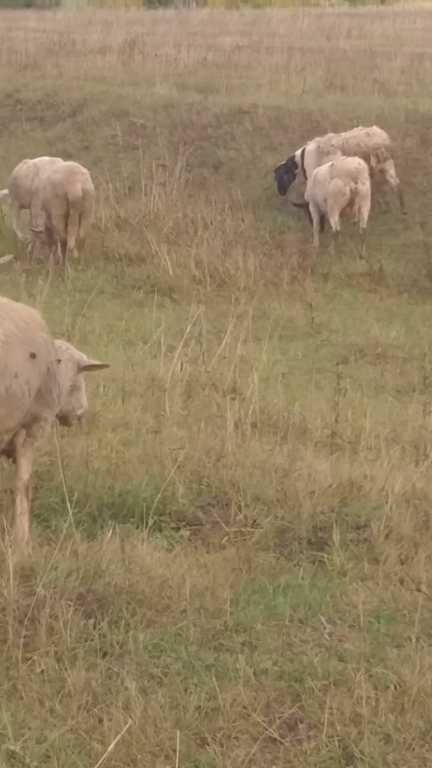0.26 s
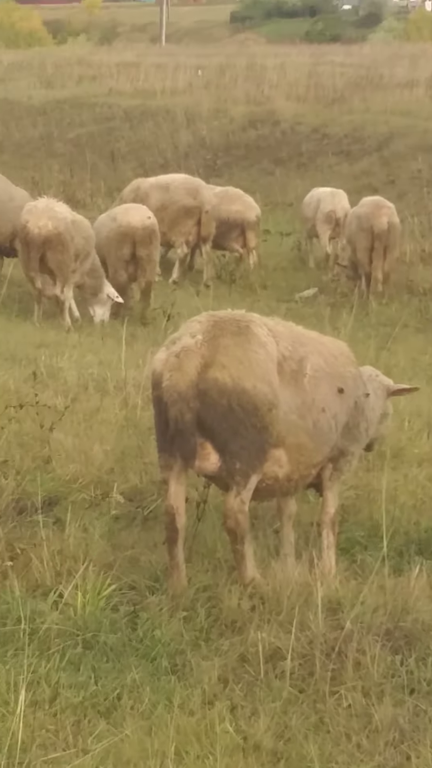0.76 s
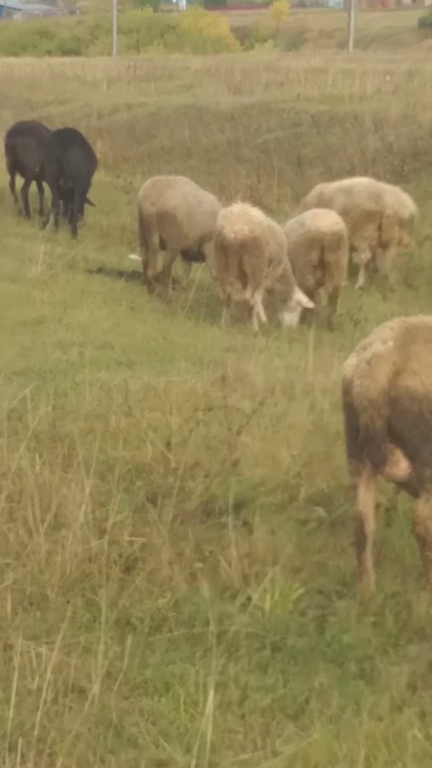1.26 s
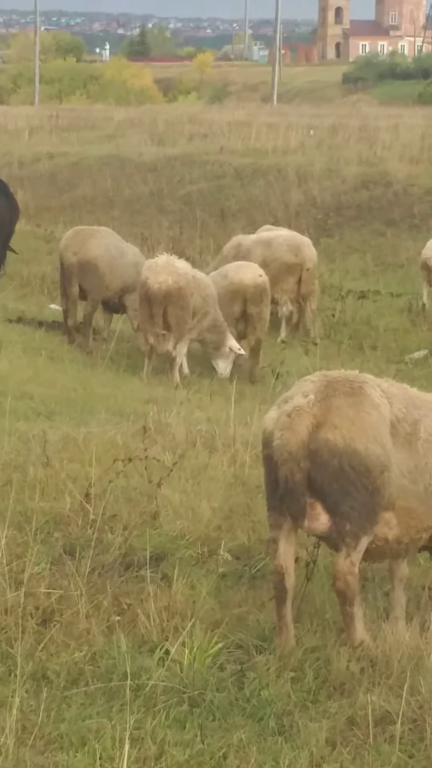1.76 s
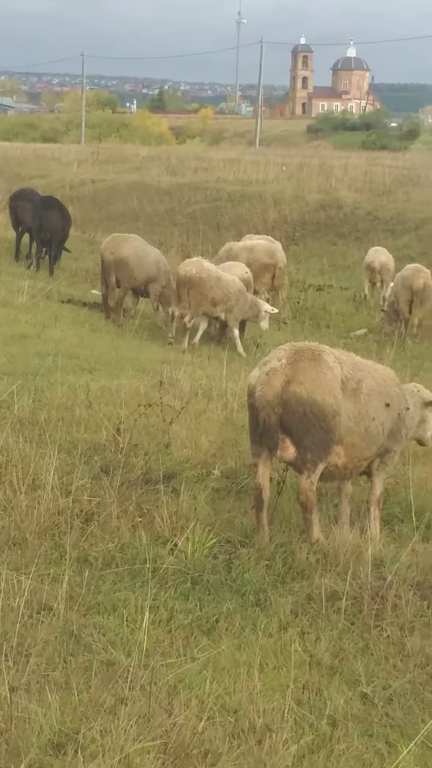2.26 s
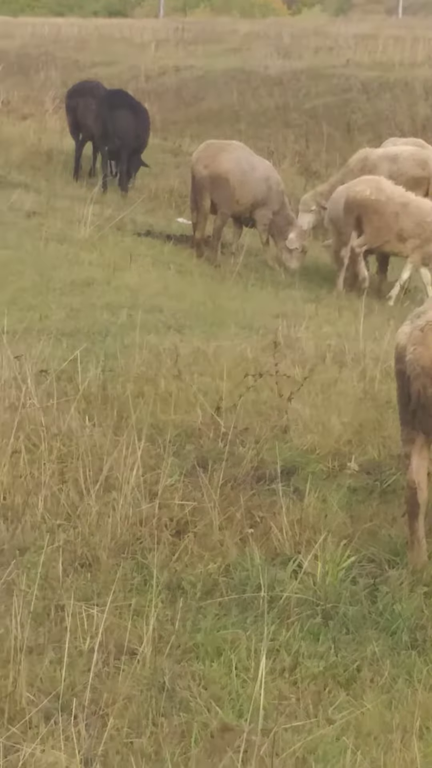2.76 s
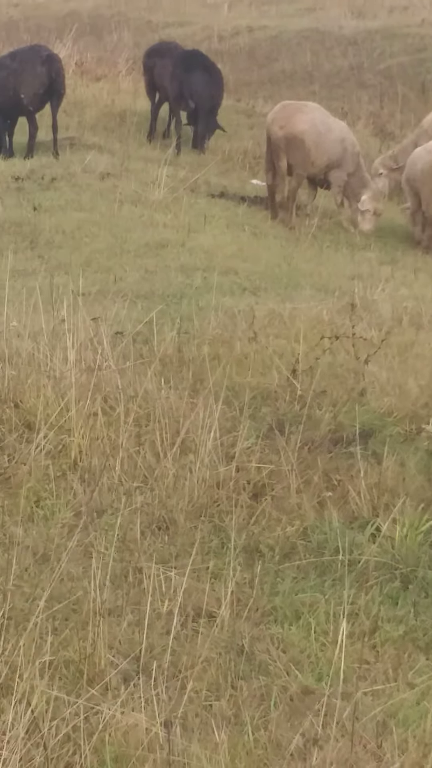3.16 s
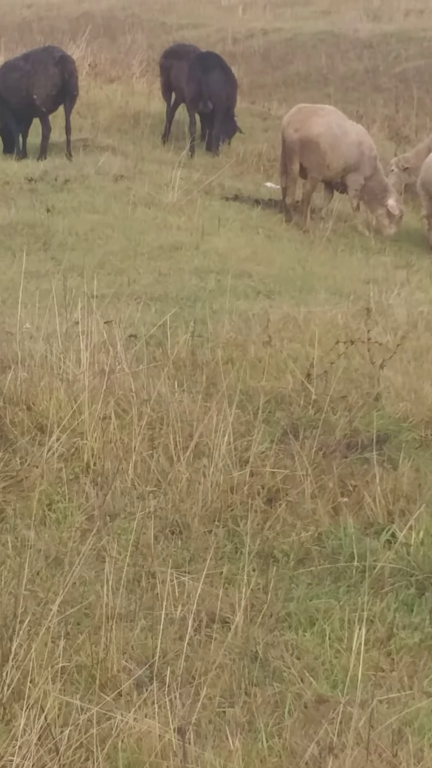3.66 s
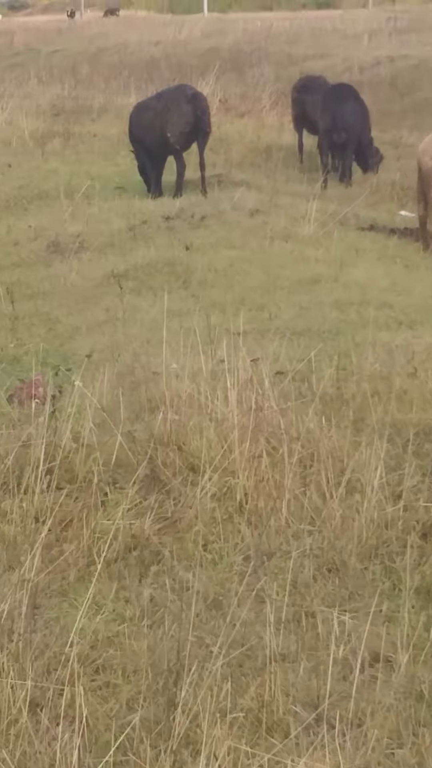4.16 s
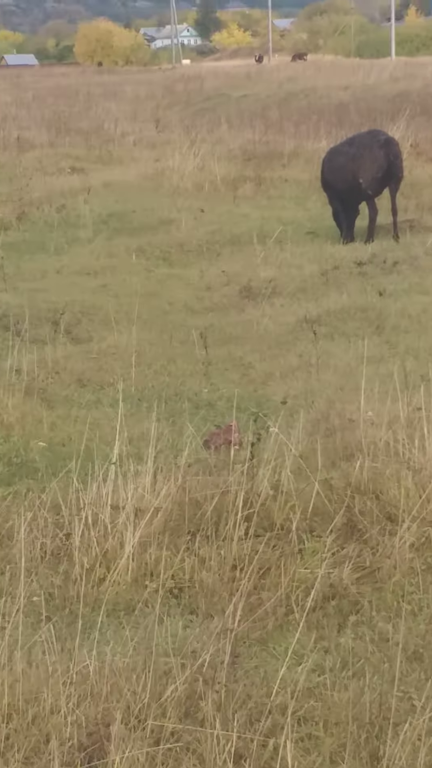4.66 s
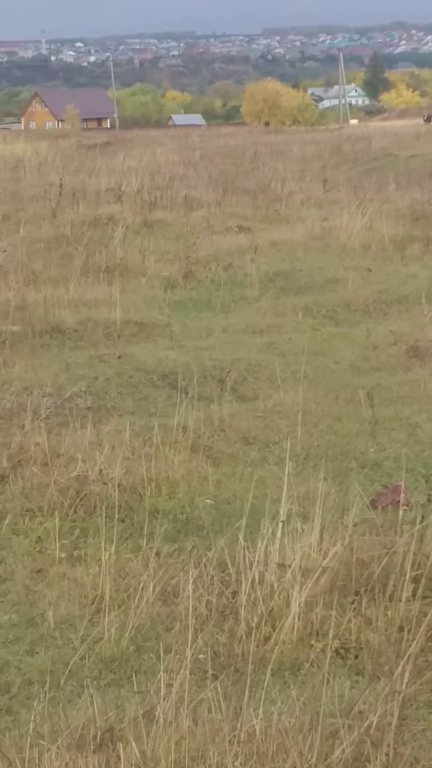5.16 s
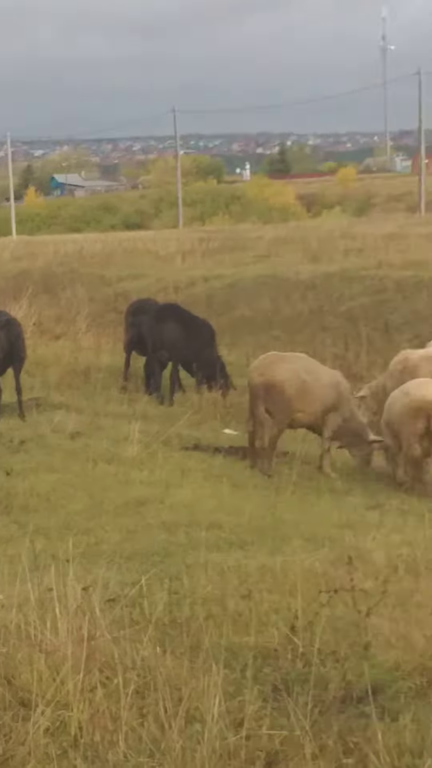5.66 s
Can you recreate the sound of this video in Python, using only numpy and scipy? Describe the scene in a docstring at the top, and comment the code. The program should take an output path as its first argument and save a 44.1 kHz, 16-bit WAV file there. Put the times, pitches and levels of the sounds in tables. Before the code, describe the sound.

Close microphone in dry grass, outdoors without echo. Light woody snaps and gentle brushing come first, then a dense, loud burst of tearing, cracking and rustling between about 1.4 and 2 seconds. It eases into isolated crunches, soft pushes through the grass and a fluctuating low rumble, with a few more snaps near the end. A faint steady air hiss runs throughout.

```python
"""Sheep graze in an open pasture while dry grass is crushed and torn right beside the microphone.
From the start, stalks snap as damped two-mode rings with noise cracks, and noise pushes rustle over a low rumble.
Early on comes one faint gliding sine, a whistle like a far bird; near 1.5 s, dense clicks rip a tuft among the
loudest snaps. Snaps then thin out between crumples, flicks and rasps; even, filtered noise lasts throughout, echo-free."""
import sys
import numpy as np
from scipy import signal
from scipy.io import wavfile
from scipy.ndimage import uniform_filter1d

SR = 44100
rng = np.random.default_rng(int(sys.argv[2]) if len(sys.argv) > 2 else 0)


def store_pcm(level_fs):
    """Save levels as 16-bit WAV."""
    pcm = np.round(np.clip(level_fs, -1, 1) * 32767).astype(np.int16)
    wavfile.write(sys.argv[1], SR, np.atleast_2d(pcm).T)


N = 261072
TIME = np.arange(N) / SR  # s
AGE = np.arange(SR // 16) / SR  # s since a stalk broke
BLOW = np.sqrt(.01 / AGE[-1])  # refers the level of a whole blow to 10 ms

# Breaking stalks; levels over 10 ms: start_s, ring_hz, wood_db, thump_db, crack_db, tick_db
SNAP_EVENTS = [(0.032, 1070, -39, -56, -62, -45.5), (0.0598, 1327, -25, -47, -70, -49),
               (0.129, 1700, -43, -72, -66, -45), (0.1958, 2040, -38.5, -51, -60, -42.5),
               (0.214, 1130, -43, -60, -56, -50), (0.293, 2060, -27.5, -43, -25.5, -47),
               (0.4743, 1660, -49, -37.5, -49, -56), (0.6576, 1170, -30.5, -26.5, -57, -57),
               (0.7248, 1860, -48, -50, -48, -48), (0.966, 1170, -41.5, -42, -59.5, -60.5),
               (1.0515, 1660, -48, -47.5, -78, -55), (1.1549, 1220, -30.5, -34, -42.5, -61),
               (1.2152, 2020, -36.5, -59, -44.5, -53), (1.254, 680, -49, -36, -50.5, -48),
               (1.419, 1330, -35.5, -51, -51.5, -66), (1.4488, 1012, -16.5, -18.5, -28.5, -58),
               (1.5567, 1026, -18.5, -17.5, -37, -23.5), (1.6389, 835, -26.5, -21.5, -26.5, -29.5),
               (1.6692, 1336, -27, -32, -26.5, -39), (1.6819, 740, -15, -17, -34, -28.5),
               (1.7022, 1630, -29, -26, -30.5, -29), (1.767, 2180, -34.5, -27, -30.5, -66),
               (1.9207, 1920, -21.5, -45, -34.5, -59), (1.987, 2090, -32.5, -42, -29, -32),
               (2.157, 790, -38.5, -36, -40.5, -46), (2.45, 1265, -27.5, -26.5, -33.5, -40),
               (2.495, 1430, -41.5, -70, -46, -53.5), (2.6192, 1310, -40.5, -36.5, -45.5, -51),
               (3.0012, 1155, -26.5, -26.5, -39, -40), (3.0915, 990, -38, -32, -39.5, -43),
               (3.333, 1040, -39, -39, -58, -75), (3.5571, 700, -44.5, -42, -41.5, -55),
               (4.1614, 870, -36.5, -35, -54.5, -64), (5.3482, 1180, -27.5, -31, -40.5, -47.5),
               (5.354, 756, -23.5, -59, -76, -80), (5.4424, 1670, -29, -32.5, -45.5, -72),
               (5.7377, 1154, -27.5, -35.5, -37, -54)]
# Small bunches of soft stems that crumple without a crack: start_s, ring_hz, level_db
CRUNCH_EVENTS = [(0.406, 1020, -46), (0.764, 885, -37), (0.811, 1560, -50), (0.871, 1320, -48),
                 (1.776, 594, -32.5), (2.2135, 670, -42), (2.681, 1180, -38), (2.874, 805, -44.5),
                 (3.881, 750, -41), (3.893, 745, -40), (4.148, 550, -35), (4.607, 840, -40),
                 (4.742, 442, -36.5), (5.677, 649, -34.5)]
# Thin dry blades that flick free, with no woody ring: start_s, level_db
FLICK_EVENTS = [(0.11, -46), (0.2871, -41.5), (0.6489, -51), (1.5443, -29.5), (1.549, -35), (1.6028, -33),
                (1.8038, -37.5), (1.8395, -51), (1.895, -43), (1.95, -43.5), (1.9801, -41.5), (2.005, -46),
                (2.131, -49.5), (2.254, -50), (2.5643, -42), (2.6112, -53.5), (2.738, -58.5),
                (4.104, -55.5), (4.237, -61.5), (4.674, -58.5), (4.955, -64), (5.468, -58)]

# Spectra give shape only, since colour() sets the level. All but WOOD_SPECTRUM have the columns
# frequency_hz, density_db (dB per Hz).
# Tug of a breaking stalk on its roots
THUMP_SPECTRUM = [(50, -40), (160, 5), (520, 0.5), (1100, -15.5), (3000, -86.5)]
# Splintering around the stalk's ring: multiple_of_ring_pitch, density_db (dB per Hz)
WOOD_SPECTRUM = [(.3, -20.5), (.9, 5.5), (1.7, 1.5), (2.8, -21), (7, -57.5)]
# Sharp crack of a stalk
CRACK_SPECTRUM = [(1600, -6.5), (3000, 2.5), (4300, -3.5), (5600, -19), (7400, -23.5), (9700, -57)]
# Fine tick of a parting skin
TICK_SPECTRUM = [(2200, 13.5), (4500, 10), (7400, 2.5), (9700, -15), (12500, -4)]
# Crackle of thin blades
CRACKLE_SPECTRUM = [(500, -4.5), (1900, 12), (4400, -1), (7500, -18.5), (9700, -36.5), (13000, -11)]
# Low rumble of movement
RUMBLE_SPECTRUM = [(20, -27), (100, -7), (170, -1.5), (260, -4.5), (420, -16), (900, -27.5), (2500, -85.5)]
# Dull crushing of the sward
CRUSH_SPECTRUM = [(50, -49.5), (200, -16.5), (420, 7.5), (1100, -4), (2000, -13), (2900, -35), (6000, -72)]
# Bright brushing of dry tips
SWISH_SPECTRUM = [(1400, -11), (2200, 1), (4400, -3.5), (5700, -21.5), (7700, -20), (9700, -36.5),
                  (13000, -21)]

# Pushes through the grass: start_s, hold_s, force_db, dryness_db (drive of swish over crushing)
PUSH_EVENTS = [(0.026, 0.22, -53.5, -5.5), (0.313, 0.16, -50, -18), (0.393, 0.16, -57.5, -36),
               (0.62, 0.044, -52, -38), (0.702, 0.3, -56, -14.5), (1.145, 0.023, -45.5, -21),
               (1.257, 0.0074, -42.5, -11), (1.389, 0.22, -37, -12), (1.571, 0.14, -27.5, -11.5),
               (1.725, 0.052, -39, -15), (1.868, 0.16, -34, -13.5), (2.212, 0.063, -37.5, -11),
               (2.385, 0.01, -48, -20), (2.506, 0.043, -51.5, -10), (2.58, 0.086, -56, -6.5),
               (2.862, 0.012, -49, -23), (3.04, 0.082, -43.5, -16), (3.173, 0.11, -50.5, -18.5),
               (3.523, 0.053, -49.5, -31), (3.947, 0.29, -43.5, -17), (4.014, 0.062, -40.5, -20),
               (4.321, 0.24, -55, -34), (5.273, 0.14, -51, -25), (5.473, 0.068, -44, -18.5),
               (5.627, 0.04, -48.5, -25), (5.688, 0.061, -41.5, -26), (5.748, 0.055, -46.5, -11.5)]
SWELL_DB_PER_S, RELEASE_DB_PER_S = 331, 283.5
# Hard pushes into damp sward heave most: dB at zero force and dryness, dB per dB force, dB lost per dB dryness
HEFT_DB, HEFT_PER_FORCE, HEFT_PER_DRYNESS = -15, 0.88, 0.66
CLUMPS_PER_S = 90  # blades give way in clumps
# Steady low rumble, before its random lumps: time_s, level_db
LOW_RUMBLE_LEVEL = [(0, -47), (1.0, -57.5), (2.3, -48), (2.79, -54), (2.88, -40.5), (3.43, -46),
                    (4.45, -39), (5.12, -43.5), (5.9, -38.5)]
STIR_DB = -20  # crushing drive that follows the low rumble

# A tuft under strain builds and lets go: time_s, level_db
TEAR_LEVEL = [(1.474, -52), (1.492, -32.5), (1.517, -26.5), (1.55, -27.5), (1.58, -36), (1.635, -54.5)]
# Fibres of the tuft
FIBRE_SPECTRUM = [(200, -4), (900, -1), (4400, -14), (6800, -32.5), (9700, -59), (12500, -42.5)]
# Blades that rasp along one another: start_s, hold_s, lower_band_hz, level_db
RASP_EVENTS = [(2.49, 0.21, 2980, -72), (3.032, 0.096, 2810, -61.5), (3.042, 0.059, 1530, -52.5),
               (3.05, 0.071, 5600, -71), (3.276, 0.019, 2820, -63), (5.69, 0.073, 2650, -68.5)]
RASP_WIDTH, RASP_PAIR = 0.13, 1.24  # bandwidth / centre, upper / lower centre (about a third)
# Far whistle, before its waver: time_s, pitch_hz, peak_level_db
WHISTLE_NOTE = [(0.229, 2050, -53), (.256, 1884, -66), (.272, 1900, -52), (.33, 1910, -54.5)]

# Still air of the open field, a dull wash with a thin hiss above it
AIR_SPECTRUM = [(1000, 1), (2000, -6), (2400, -18.5), (9000, -28), (15000, -26.5)]
# Part of the hiss that differs between left and right
WIDE_HISS_SPECTRUM = [(450, -33.5), (1400, 13.5), (2400, -0.5), (15000, -0.5)]
AIR_DB, WIDE_HISS_DB = -61.5, -79
EDGE_HZ = 16000  # upper band limit of the recorder


def snaps():
    """Superposition: every breaking stalk, crumpling bunch and flicking blade adds at its own time."""
    mix = np.zeros(N)
    for table, sound in (SNAP_EVENTS, snap), (CRUNCH_EVENTS, crunch), (FLICK_EVENTS, flick):
        for start, *row in table:
            add(mix, start, sound(*row))
    return mix


def snap(hz, wood_db, thump_db, crack_db, tick_db, fracture_db=-4, shake_db=-24):
    """Brittle fracture: a tick and crack, the stalk's ring, a tug on the roots and a shake of nearby blades."""
    root_swing = unit(np.sin(2 * np.pi * AGE / 0.0061) * dying(t60=0.0027))
    tug = root_swing + 6.7 * unit(burst(t60=0.023))
    thump = amp(thump_db) * colour(tug, THUMP_SPECTRUM)
    skin = amp(fracture_db) * fracture()
    parting = unit(burst(t60=0.018))
    shake = amp(shake_db) * unit(burst(t60=0.083))
    crack = amp(crack_db) * colour(skin + parting + shake, CRACK_SPECTRUM)
    tick = amp(tick_db) * colour(skin + unit(burst(t60=0.0034)), TICK_SPECTRUM)
    wood = amp(wood_db) * stalk(hz)
    return (thump + wood + crack + tick) * BLOW


def stalk(hz, ring_cycles=20, rise_s=0.00027, splinter_t60=0.031, splinter_db=-2, upper_db=-10):
    """Damped modes: a freed stalk rings at two pitches, longer when low, while its fibres splinter."""
    upper_hz = hz * rng.uniform(1.14, 1.2)
    lower, upper = (np.sin(2 * np.pi * f * AGE) * dying(ring_cycles / f) for f in (hz, upper_hz))
    onset = (1 - np.exp(-AGE / rise_s)) ** 2
    ring = unit((lower + amp(upper_db) * upper) * onset)
    spectrum = [(hz * multiple, db) for multiple, db in WOOD_SPECTRUM]
    splinters = colour(burst(splinter_t60), spectrum)
    return unit(ring + amp(splinter_db) * splinters)


def fracture():
    """Impulsive release: the outer skin of a stem gives way at once in one sharp click."""
    return unit(np.exp(-((AGE - 0.0012) / 0.00002) ** 2))


def burst(t60, rise_s=0.00066):
    """Transient noise: parting fibres give a puff that builds quickly and dies away."""
    return rng.standard_normal(len(AGE)) * dying(t60) * (1 - np.exp(-AGE / rise_s))


def crunch(hz, db, gap_s=0.00253, spread=0.326, tug_db=-5, count=3):
    """Successive buckling: soft stems crumple one just after another, at random pitches, and tug at the turf."""
    stems = np.zeros(len(AGE))
    for k in range(count):
        stem_hz = hz * np.exp(spread * rng.standard_normal())
        add(stems, k * gap_s, stalk(stem_hz))
    tug = amp(tug_db) * colour(burst(t60=0.045), THUMP_SPECTRUM)
    return amp(db) * (unit(stems) + tug) * BLOW


def flick(db, body_db=-3):
    """Sudden release: a thin blade flicks free with a sharp tick and a little crackle under it."""
    tick = colour(fracture() + unit(burst(t60=0.00346)), TICK_SPECTRUM)
    crackle = amp(body_db) * colour(burst(t60=0.022), CRACKLE_SPECTRUM)
    return amp(db) * (tick + crackle) * BLOW


def tear():
    """Progressive rupture: fine fibres part in a dense run that builds quickly and thins out."""
    fibres = grains(per_s=5000, spread_db=4, smooth=.3)
    level_db = np.interp(TIME, *np.transpose(TEAR_LEVEL), left=-np.inf, right=-np.inf)
    return amp(level_db) * colour(fibres, FIBRE_SPECTRUM)


def rustle(crush_clump_db=2, swish_clump_db=2.45, lumps_db=2.87, crush_trim_db=-3, swish_trim_db=-8.5):
    """Slip and buckling in clumps: dull where the sward is crushed, bright where dry tips brush."""
    low, heaving, crushing, swishing = movement()
    slips = grains(per_s=1100, spread_db=4, smooth=.7)
    buckles = grains(per_s=120, spread_db=4.5, smooth=0)
    rumble = colour(rng.standard_normal(N), RUMBLE_SPECTRUM) * amp(lumps_db * wander(per_s=8.5))
    heave = unit(band(colour(rng.standard_normal(N), RUMBLE_SPECTRUM), low_hz=127, high_hz=1980))
    crush = colour(slips, CRUSH_SPECTRUM) + .8 * small_stems()
    tips = .6 * colour(buckles, TICK_SPECTRUM) + .4 * colour(buckles, CRACKLE_SPECTRUM)
    swish = colour(slips, SWISH_SPECTRUM) + tips
    crush_gain = amp(crush_trim_db + crush_clump_db * wander(CLUMPS_PER_S)) * crushing
    swish_gain = amp(swish_trim_db + swish_clump_db * wander(CLUMPS_PER_S)) * swishing
    return low * rumble + heaving * heave + crush_gain * crush + swish_gain * swish


def movement():
    """Addition of powers: gains of the steady rumble and of the heave, crushing and swish driven by pushes."""
    low = amp(np.interp(TIME, *np.transpose(LOW_RUMBLE_LEVEL)))
    power = np.outer([0, amp(STIR_DB), 0], low) ** 2  # rows: heave, crushing, swish
    for start, hold, force_db, dry_db in PUSH_EVENTS:
        heft_db = HEFT_DB + HEFT_PER_FORCE * force_db - HEFT_PER_DRYNESS * dry_db
        drives = amp([heft_db, force_db, force_db + dry_db])
        power += np.outer(drives, swell(start, hold)) ** 2
    return low, *np.sqrt(power)


def swell(start, hold):
    """Exponential growth and decay: a push swells, holds and lets go."""
    before = np.maximum(start - TIME, 0)
    after = np.maximum(TIME - start - hold, 0)
    return amp(-SWELL_DB_PER_S * before - RELEASE_DB_PER_S * after)


def small_stems(low_hz=420, high_hz=2200, count=14):
    """Random excitation of resonators: small stems buckle and ring; the thin, high ones are weaker."""
    stems = []
    for hz in np.geomspace(low_hz, high_hz, count):
        buckles = grains(per_s=16, spread_db=2.5, smooth=0)
        stems.append(signal.oaconvolve(buckles, stalk(hz) / hz)[:N])
    return unit(sum(stems))


def rasps():
    """Friction and resonance: sliding blades sing in a pair of narrow, fuzzy bands."""
    slips = grains(per_s=900, spread_db=3, smooth=.7)
    edges = np.array([1 - RASP_WIDTH / 2, 1 + RASP_WIDTH / 2])
    mix = np.zeros(N)
    for start, hold, hz, db in RASP_EVENTS:
        lower = band(slips, *hz * edges)
        upper = band(slips, *hz * RASP_PAIR * edges)
        mix += amp(db) * swell(start, hold) * unit(lower + upper)
    return mix


def whistle(waver=0.0054):
    """Frequency modulation: a sine glides and wavers as a short, thin note from far away."""
    s, hz, db = np.transpose(WHISTLE_NOTE)
    gate = uniform_filter1d(1. * (TIME > s[0]) * (TIME < s[-1]), size=500)  # softened ends
    level = amp(np.interp(TIME, s, db)) * gate
    pitch_hz = np.interp(TIME, s, hz) * (1 + waver * wander(per_s=110))
    return level * np.sin(2 * np.pi * np.cumsum(pitch_hz) / SR)


def air():
    """Stationary noise: an even wash common to both sides, with a little hiss of opposite sign on each."""
    shared, apart = rng.standard_normal((2, N))
    side = amp(WIDE_HISS_DB) * colour(apart, WIDE_HISS_SPECTRUM)
    return amp(AIR_DB) * colour(shared, AIR_SPECTRUM) + np.array([side, -side])


def microphones(x, lean_db=-19, skew_samples=0.022):
    """Level and time differences: the left has a little more middle range and hears all a shade earlier."""
    side = amp(lean_db) * band(x, low_hz=1134, high_hz=2970)
    side = side + skew_samples / 2 * np.gradient(x)  # a slope added or taken away is a tiny time shift
    return np.array([x + side, x - side])


def amp(db):
    """Logarithmic level: decibels to amplitude gain."""
    return 10 ** (np.asarray(db) / 20)


def unit(x):
    """Mean-square normalization: scales to rms 1."""
    return x / np.sqrt(np.mean(x ** 2) + 1e-20)


def add(mix, s, sound):
    """Linear superposition: adds a sound into the mix at time s."""
    part = mix[max(round(s * SR), 0):][:len(sound)]
    part += sound[:len(part)]


def colour(x, points, size=2048):
    """Minimum-phase filtering: shapes the spectrum causally, so that attacks stay sharp; rms 1."""
    hz, db = np.transpose(points)
    bins_hz = abs(np.fft.fftfreq(size, 1 / SR)) + 1
    log_gain = np.log(amp(np.interp(np.log(bins_hz), np.log(hz), db)))
    spectrum = np.exp(np.conj(signal.hilbert(log_gain)))  # phase follows from the log gain
    response = np.fft.ifft(spectrum).real[:size // 2]
    return unit(signal.fftconvolve(x, response)[:len(x)])


def band(x, low_hz, high_hz):
    """Band-pass filtering: keeps one band of frequencies."""
    return signal.sosfilt(signal.butter(2, [low_hz, high_hz], "bandpass", fs=SR, output="sos"), x)


def dying(t60):
    """Exponential damping: falls 60 dB in t60 seconds."""
    return np.exp(-np.log(1000) * AGE / t60)


def wander(per_s):
    """Random modulation: joins per_s chance values a second by straight lines; rms 1."""
    knots = rng.standard_normal(N // 50)
    return unit(np.interp(TIME * per_s, np.arange(len(knots)), knots))


def grains(per_s, spread_db, smooth):
    """Poisson-like impulses: tiny random clicks of unequal size over a smooth rub."""
    size = amp(spread_db * np.minimum(rng.exponential(1, N), 3))
    struck = rng.random(N) < per_s / SR
    clicks = size * rng.choice([-1, 1], N) * struck
    return unit(clicks) + smooth * rng.standard_normal(N)


def scene():
    """Superposition in the open: grass sounds and whistle, nearly centred, over the still air."""
    return microphones(snaps() + tear() + rustle() + rasps() + whistle()) + air()


def record(dry, low_cut_hz=50):
    """Band limitation: the microphone's low cut, then the recorder's upper limit."""
    lean = signal.sosfilt(signal.butter(2, low_cut_hz, "highpass", fs=SR, output="sos"), dry)
    low_pass = signal.firwin(255, EDGE_HZ, window=("kaiser", 9), fs=SR)
    return signal.oaconvolve(lean, low_pass[None], "same")


dry = scene()
out = record(dry)
store_pcm(out)
```